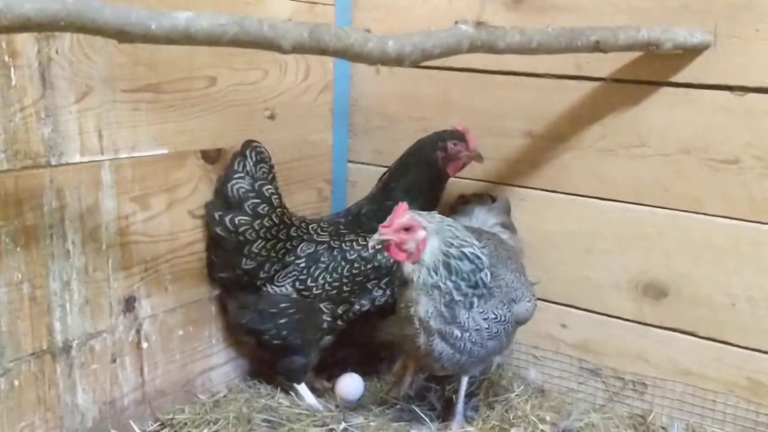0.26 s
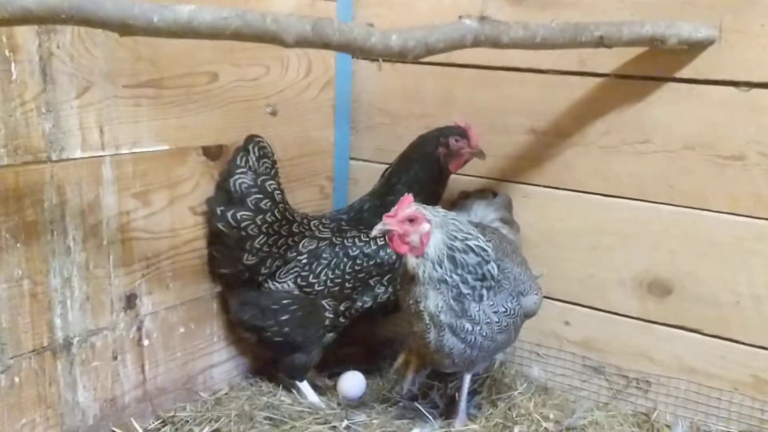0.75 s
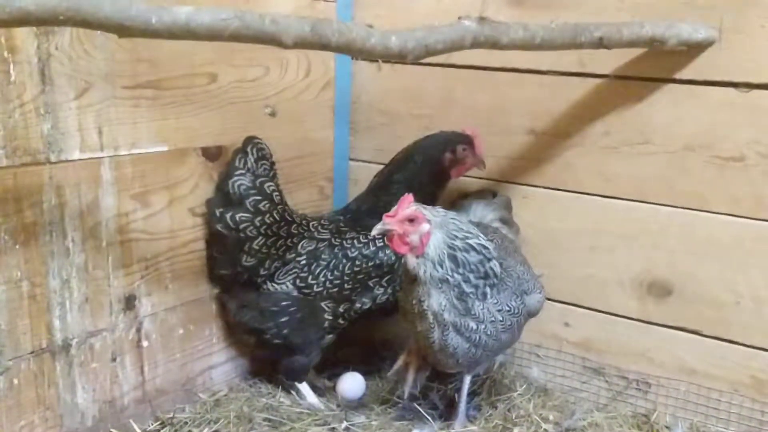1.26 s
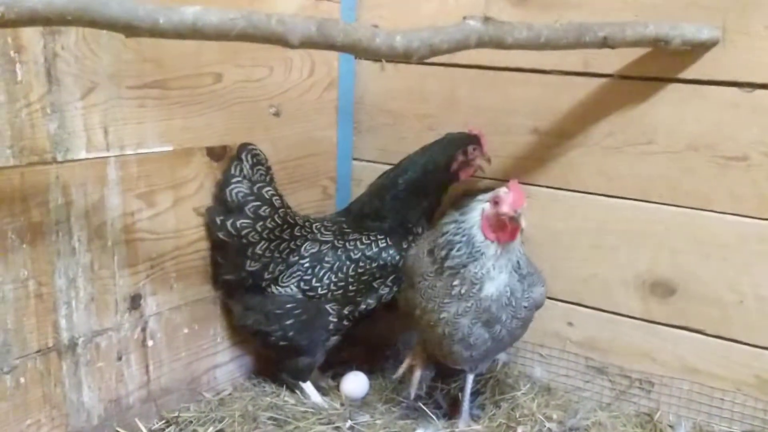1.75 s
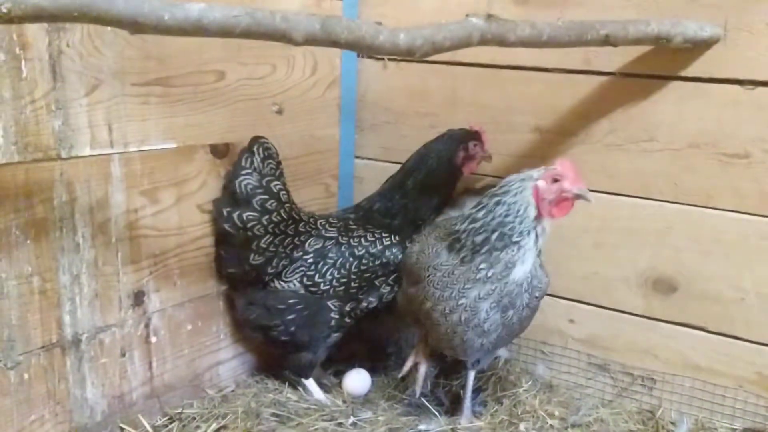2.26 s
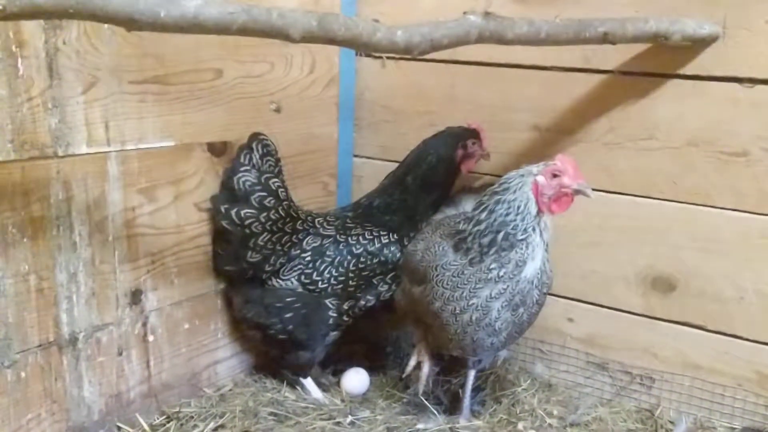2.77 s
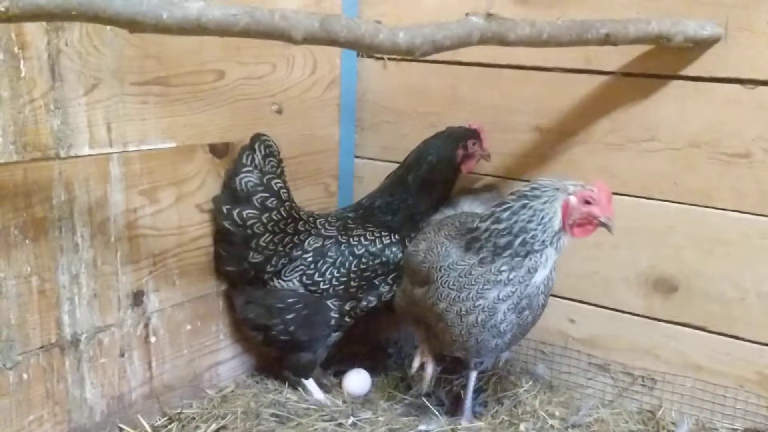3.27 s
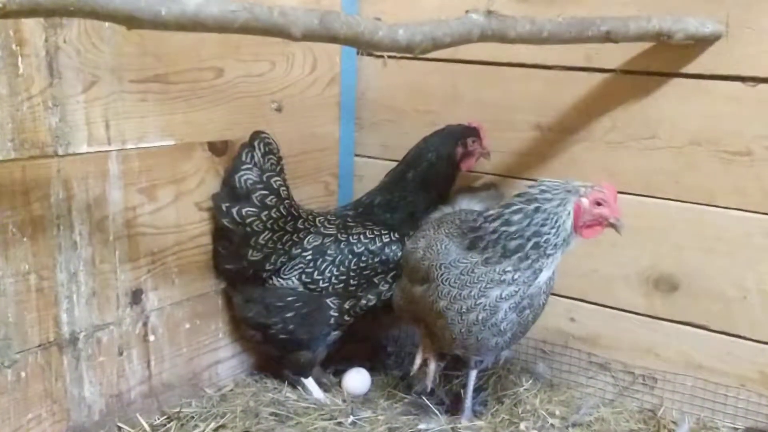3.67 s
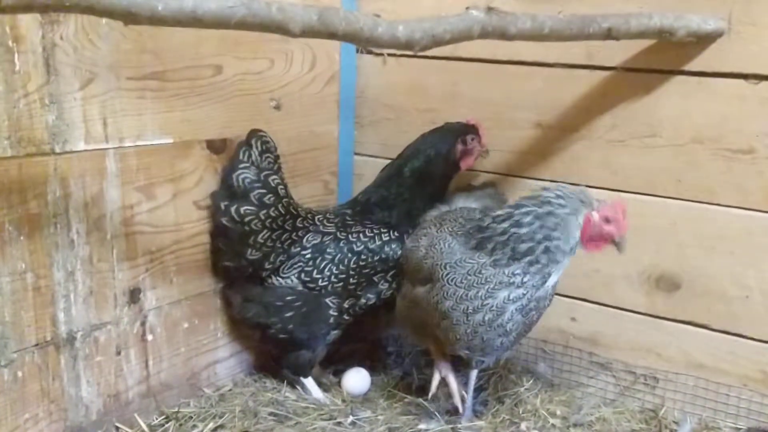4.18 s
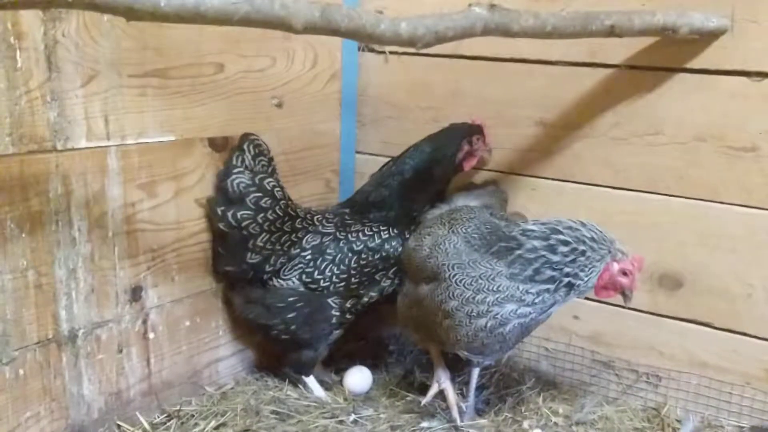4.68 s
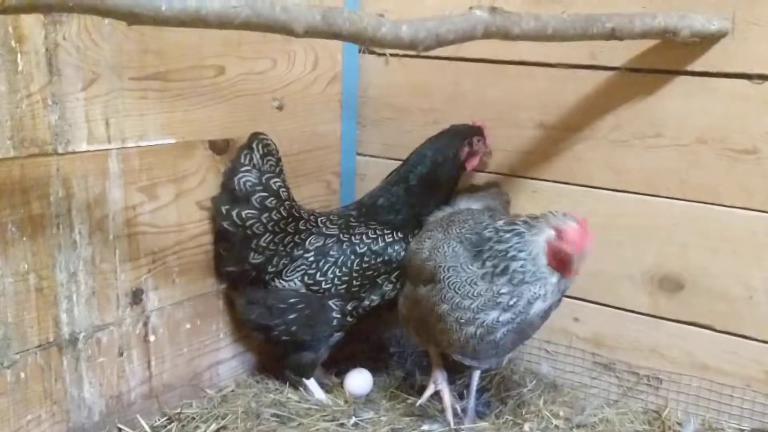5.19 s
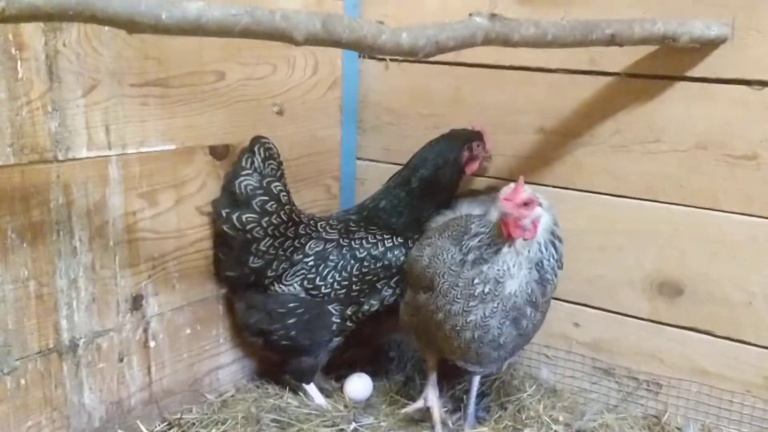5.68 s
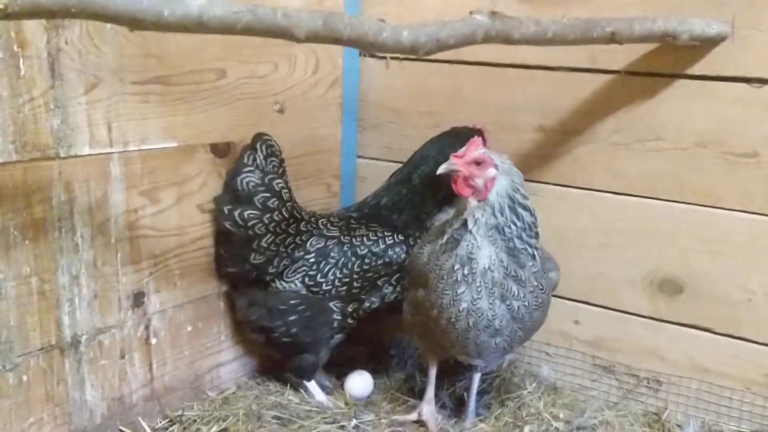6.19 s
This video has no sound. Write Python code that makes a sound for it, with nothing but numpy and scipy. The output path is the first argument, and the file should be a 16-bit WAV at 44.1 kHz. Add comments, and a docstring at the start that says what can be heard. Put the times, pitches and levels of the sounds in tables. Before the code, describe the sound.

A low rumble and soft microphone hiss run throughout, inside a wooden coop with a short echo. From about 0.3 to 1.2 seconds a hen whines softly in quavering, slightly raspy notes. Another hen, close to the phone, gives short clucks at 1.2 and 1.4 seconds, then a tiny beak snap and a loud cackle from 1.5 to 1.9 seconds. The cry holds its pitch, rises a little, then breaks hoarsely and drops. In the pause a metal tube rings very faintly around 2.5 and 3.7 seconds, and distant birds give brief, faint calls near 0.5, 2.6 and 3.7 seconds. Three more short clucks come at about 4.0, 4.2 and 4.4 seconds, with small dry beak snaps, leading into a second loud cackle from 4.5 to 4.9 seconds with the same broken ending. Only rumble and hiss remain until about 6.4 seconds.

```python
"""A hen in a wooden coop cackles twice, each long cry led by short clucks, close to a phone.
Membranes beating in her voice box make the cries; puffs of air ringing her throat make the clucks.
Another hen whines softly, far birds call, a hanging metal tube rings faintly, and the walls echo.
Under it all lie a low rumble and microphone hiss. The phone turns its gain down while the hen is loud."""
import sys
import numpy as np
from scipy import signal
from scipy.fft import rfft, irfft, next_fast_len
from scipy.io import wavfile
from scipy.ndimage import uniform_filter1d, minimum_filter1d, map_coordinates

SR = 44100
rng = np.random.default_rng(int(sys.argv[2]) if len(sys.argv) > 2 else 0)


def dump(signal):
    """Clip the signal to [-1, 1] and save it as 16-bit WAV at the path in sys.argv[1]."""
    limited = np.clip(np.atleast_2d(signal).T, -1, 1)
    pcm = np.round(limited * 32767).astype(np.int16)
    wavfile.write(sys.argv[1], SR, pcm)


N = 284004

# Tone colour of the rumble and hiss: (frequency [Hz], relative level [dB])
BACKGROUND_COLOUR = [(12, -50), (20, -20.5), (41, -8.5), (64, 4.5), (106, -9.5), (186, -16.5), (353, -20.5),
                     (453, -22), (708, -23.5), (884, -24), (1930, -30), (2100, -29), (15600, -43)]
# How the rumble rises and falls: (time [s], level [dB])
RUMBLE_LEVELS = [(0, -59), (.15, -66.5), (1.101, -67), (2.3, -62), (3.7, -69), (5.202, -63), (5.85, -66.5),
                 (6.1, -62.5), (6.44, -68)]
# How long the coop echoes: (frequency [Hz], time to fade by 60 dB [s])
ECHO_TIMES = [(200, 0.73), (900, 0.33), (2500, 0.28), (6000, 0.26), (10000, 0.022)]
# How strongly the walls echo: (frequency [Hz], level [dB])
ECHO_LEVELS = [(200, -19), (520, -13.5), (780, 0.5), (1100, -11), (1800, -8), (2300, 2.5), (2850, -10.5),
               (3400, -5), (4000, -18), (4600, -7), (5000, -18.5), (5400, -12.5), (10000, 0)]
# The tube's ringing tones: (frequency [Hz], relative level [dB], time to fade by 60 dB [s])
TUBE_TONES = [(1118, 0, 1.1), (3188, 3, .22), (4750, -6, .2), (5517, -2, .2)]
# Touches on the tube: (time [s], level [dB], treble boost [dB per two octaves])
TUBE_TAPS = [(2.452, -70.5, -3.5), (2.569, -79, -1.5), (3.663, -79, 7), (3.7, -72.5, 8.5), (3.736, -81, 5)]
# Far bird calls: (time [s], length [s], first pitch [Hz], last pitch [Hz], level [dB],
# then the relative levels of harmonics 1 to 5 [dB]). A harmonic is a whole multiple of the pitch.
FAR_CALLS = [(.51, 0.038, 862, 856, -56, -51, -4, -34, -26, -20),
             (2.625, 0.062, 927, 868, -61, -2, -17, -29.5, -25, -26),
             (2.65, 0.071, 879, 852, -58.5, -5, -1, -26, -25, -26),
             (3.657, 0.022, 1253, 1200, -53, -4.5, -13.5, -10, -30, -27)]
# The other hen, one list per note: (time [s], pitch [Hz], level [dB])
WHINE_NOTES = [
    [(0.25, 523, -70), (0.26, 496, -62), (0.296, 483, -57.5), (0.305, 517, -66)],
    [(.29, 590, -66), (.335, 791, -64.5), (.377, 726.6, -63), (.5, 790, -66), (.6, 732, -72),
     (.694, 787, -57.5), (.74, 803, -70), (.802, 693, -56), (.83, 686, -73), (.85, 677, -82)],
    [(.875, 824, -73), (.911, 694, -59), (.965, 801, -60.5), (1.013, 724.6, -64), (1.09, 749, -56),
     (1.12, 705, -72), (1.165, 722, -53)],
]
# Beak snaps: (time [s], level before filtering [dB], treble cutoff [Hz])
BEAK_SNAPS = [(1.524, -31, 7030), (4.4435, -29, 15000), (4.505, -32.5, 8040)]
# Where the throat rings: (frequency [Hz], width [Hz], level [dB])
THROAT_RESONANCES = [(231, 360, -14.5), (882, 150, 0), (1078, 79.3, 8), (1890, 220, -9.5),
                     (2470, 250, -17.5)]
# Where the beak rings, applied twice: (frequency [Hz], width [Hz], level [dB])
BEAK_RESONANCES = [(3427, 590, 4), (4710, 430, 1.5), (5250, 260, 5.5), (6925, 1000, -1), (8800, 1300, -2.5)]
# Short clucks: (time [s], length [s], first puff rate [Hz], top puff rate [Hz], throat drive [dB],
# throat swell [dB], beak drive [dB], peak of the hiss [share of the length])
SHORT_CLUCKS = [(1.167, 0.04, 189.5, 252.8, -11, 7.2, -29.5, 0.47),
                (1.397, .018, 188.8, 234.2, -18.5, 4.5, -37.5, 0.578),
                (1.412, .052, 277.7, 392.3, -1.5, 4.7, -17.5, 0.78),
                (3.961, 0.034, 199.4, 249.6, -7.5, 11, -29, 0.69),
                (4.189, 0.049, 218.8, 341.3, -0.5, 13.7, -24.5, .8),
                (4.416, .034, 226.6, 253, -2.5, 17, -25.5, 1)]
# Tone colour of the breath in a cry: (frequency [Hz], relative level [dB])
BREATH_COLOUR = [(300, -34), (850, -8), (1300, -20), (1800, -36), (2300, -14), (2850, -44), (3400, -5),
                 (4400, -7), (4900, -16), (5400, -4), (6500, -6), (9400, -15), (11000, -40), (15000, -46)]
# The voice, one list per cry: (time [s], pitch [Hz], hoarseness [0 clear to 1 broken])
CRY_VOICE = [
    [(1.525, 498, .6), (1.547, 517, .3), (1.571, 524, .2), (1.621, 512, .25), (1.655, 528, .45),
     (1.74, 529, .4), (1.765, 535, .15), (1.818, 535, .12), (1.872, 556, .12), (1.886, 571, .55),
     (1.9, 512, .9), (1.917, 442, .9), (1.94, 400, .95)],
    [(4.506, 505, .6), (4.532, 521, .2), (4.62, 521, .24), (4.72, 529, .2), (4.735, 526, .2),
     (4.79, 540, .3), (4.828, 549, .5), (4.844, 579, .75), (4.858, 528, .9), (4.875, 480, .9),
     (4.89, 428, .9), (4.91, 400, .95)],
]
# How the level of each cry rises and dips and its tone colour shifts: (time [s], level of the strong second #
# harmonic [dB], base level of the rest [dB], beak opening [below 0 narrow, above 0 wide])
CRY_LEVELS = [
    [(1.525, -17.5, -32, -0.78), (1.538, -12, -31, -0.77), (1.557, -21.5, -37, -1.66),
     (1.585, -20, -37.5, -1.73), (1.635, -28, -40, -.2), (1.662, -13.5, -37.5, -0.84),
     (1.722, -22.5, -36.5, 0.3), (1.762, -15, -35, 0.0072), (1.81, -17, -38.5, 0.15),
     (1.867, -19, -37, 0.75), (1.89, -18.5, -39, 1.02), (1.915, -25.5, -44, 0.13), (1.94, -38.5, -58, 1.3)],
    [(4.506, -13.5, -28, -0.33), (4.516, -12.5, -39, -1.1), (4.535, -17.5, -35.5, -1.1),
     (4.592, -14.5, -36.5, -0.21), (4.66, -22.5, -37.5, .05), (4.717, -14, -37, -0.1),
     (4.74, -21, -37, 0.3), (4.78, -15.5, -37.5, 0.05), (4.825, -18, -38, 1.33), (4.86, -25, -41.5, 0.55),
     (4.88, -24, -47.5, .6), (4.91, -47, -52.5, 0.68)],
]
# Harmonics that follow the beak opening: (multiple of the pitch, relative level at opening 0 [dB],
# change at opening -1 [dB], change at opening +1 [dB])
BEAK_HARMONICS = [(1, -2.5, 2.5, 10.5), (3, 6, -8, -3), (4, -10, 1, 13), (5, -3, -9.5, -9.5),
                  (6, -7, 12, -0.5), (7, -11, 8, 4), (8, -10, -11, 12.5), (9, -10.5, -0.5, -5),
                  (10, -0.5, 1, -5.5), (11, -6, 1.5, -2.5), (12, -3, -0.5, -5.5)]
# High harmonics that ignore the beak opening: (multiple of the pitch, relative level [dB])
HIGH_HARMONICS = [(13, -14.5), (14, -17.5), (15, -13), (16, -16), (17, -13.5), (18, -22), (19, -31.5),
                  (20, -40), (21, -50), (22, -45), (24, -37.5), (26, -40)]


def amp(db):
    """Turn decibels into a factor to multiply by."""
    return 10 ** (np.asarray(db) / 20)


def unit(x):
    """Scale x to an average power of 1."""
    return x / np.sqrt(np.mean(x ** 2) + 1e-20)


def along(points, hz):
    """Read between (frequency, value) points, with octaves evenly spaced."""
    f, v = np.transpose(points)
    return np.interp(np.log(hz + 1), np.log(f + 1), v)


def played(rows, fade_s):
    """Turn timed rows into a first sample, a fade in and out, and one curve per column."""
    times, *columns = np.transpose(rows)
    t = np.arange(times[0], times[-1], 1 / SR)
    fades = np.clip(np.minimum(t - times[0], times[-1] - t) / fade_s, 0, 1)
    return round(times[0] * SR), fades, [np.interp(t, times, c) for c in columns]


def add(out, start, x):
    """Mix x into out, beginning at sample start."""
    out[start:start + len(x)] += x[:len(out) - start]


def wobble(size, rate, channels=1):
    """Smooth curves through rate random points a second."""
    points = rng.standard_normal((channels, int(size * rate / SR) + 4))
    return np.array([map_coordinates(p, [np.arange(size) * rate / SR]) for p in points])


def filtered(x, response):
    """Scale each frequency of x by response(frequency), leaving room for a short tail."""
    size = next_fast_len(len(x) + SR // 4)
    return irfft(rfft(x, size) * response(np.fft.rfftfreq(size, 1 / SR)), size)[:len(x) + SR // 20]


def resonances(rows):
    """The response of a hollow space that rings at a few frequencies."""
    return lambda f: sum((-1) ** k * amp(db) * 1j * f * width / (hz * hz - f * f + 1j * f * width)
                         for k, (hz, width, db) in enumerate(rows))


def noise(size, colour):
    """Noise with the given tone colour and an average power of 1."""
    return unit(filtered(rng.standard_normal(size), lambda hz: amp(along(colour, hz)))[:size])


def rumble_and_hiss():
    """A far rumble swells unevenly under smooth microphone hiss."""
    times, db = np.transpose(RUMBLE_LEVELS)
    bass = [p for p in BACKGROUND_COLOUR if 30 < p[0] < 130]
    rumble = noise(N, [(10, -65.5), (25, -22)] + bass + [(170, -43.5), (300, -87)])
    hiss = noise(N, [(60, -65.5)] + [p for p in BACKGROUND_COLOUR if p[0] > 100])
    swells = amp(2.2 * wobble(N, 5.2)[0])
    return amp(np.interp(np.arange(N) / SR, times, db)) * swells * rumble + amp(-69) * hiss


def fading_cluck():
    """The walls still ring from a cluck just before the start."""
    t = np.arange(N) / SR
    ring = unit(filtered(rng.standard_normal(N), resonances(THROAT_RESONANCES))[:N])
    return amp(-63 - 60 * t / .5) * ring


def coop_echo(x):
    """Plank walls echo the sound in short, overlapping, diffuse tails."""
    out, step = np.zeros(N), SR // 6
    for start in range(0, N - 2 * step, step):
        # each echo is fresh noise in which every frequency fades at its own speed
        hz, t, bands = signal.stft(rng.standard_normal(SR // 2), SR, nperseg=256)
        tail = signal.istft(bands * amp(-60 * t / along(ECHO_TIMES, hz)[:, None]), SR, nperseg=256)[1]
        piece = x[start:start + 2 * step] * np.hanning(2 * step)
        add(out, start + 300, signal.fftconvolve(piece, tail / np.linalg.norm(tail)))
    return filtered(out, lambda hz: amp(along(ECHO_LEVELS, hz)))[:N]


def metal_tube():
    """Soft touches set the metal ringing, some dull, some bright."""
    out, t = np.zeros(N), np.arange(SR // 2) / SR
    onset = 1 - np.exp(-t / .0044)
    for time, tap_db, treble_db in TUBE_TAPS:
        for hz, tone_db, ring_s in TUBE_TONES:
            strength_db = tap_db + tone_db + treble_db * np.log2(hz / TUBE_TONES[0][0]) / 2
            level_db = strength_db + 3.7 * wobble(len(t), 25)[0] - 60 * t / ring_s
            add(out, round(time * SR), amp(level_db) * np.sin(2 * np.pi * hz * t) * onset)
    return out


def far_birds():
    """Far birds call in short falling notes with a few harmonics."""
    out = np.zeros(N)
    for time, length, first_hz, last_hz, db, *harmonics_db in FAR_CALLS:
        progress = np.arange(0, 1, 1 / (length * SR))
        phase = 2 * np.pi * np.cumsum(first_hz + (last_hz - first_hz) * progress) / SR
        note = sum(amp(level) * np.sin(k * phase) for k, level in enumerate(harmonics_db, 1))
        add(out, round(time * SR), amp(db) * np.sin(np.pi * progress) ** .58 * note)
    return out


def whining_hen(octave_db=-17.5):
    """Another hen holds soft, quavering, slightly raspy notes."""
    out = np.zeros(N)
    for rows in WHINE_NOTES:
        start, fades, (hz, db) = played(rows, fade_s=.006)
        quaver, throb = wobble(len(hz), 31.14, channels=2)
        rasp = wobble(len(hz), 151.2)[0]
        phase = 2 * np.pi * np.cumsum(hz * (1 + .03 * quaver + .03 * rasp)) / SR
        note = np.sin(phase) + amp(octave_db) * np.sin(2 * phase)
        add(out, start, fades * np.sqrt(2) * amp(db + 3.4 * throb) * note)
    return out


def beak_snaps():
    """The beak snaps with a dry crack of about a millisecond."""
    out, t = np.zeros(N), np.arange(200) / SR
    for time, db, cutoff_hz in BEAK_SNAPS:
        crack = amp(db - 60 * t / .0015) * rng.standard_normal(len(t))
        add(out, round(time * SR), filtered(crack, lambda f: 1j * f / 3000 / (1 + 1j * f / cutoff_hz) ** 5))
    return out


def clucks():
    """Soft puffs of air ring the throat; each carries a short hiss through the beak."""
    onset_s, onset_db, ebb_db = .011, 19, 3
    hiss_onset_db, hiss_rise_db, hiss_fall_db = 23, 21.5, 15
    glide_end, throat_peak = .66, .7  # shares of the length
    throat, beak = resonances(THROAT_RESONANCES), resonances(BEAK_RESONANCES)
    soft = lambda f: 1 / (1 + 1j * f / 1800) ** 3  # a rounded puff has little treble
    out = np.zeros(N)
    for time, length, first_hz, top_hz, throat_db, swell_db, beak_db, hiss_peak in SHORT_CLUCKS:
        start, progress = round(time * SR), np.arange(0, 1, 1 / (length * SR))
        hz = first_hz + (top_hz - first_hz) * np.minimum(progress / glide_end, 1)
        # throat and beak both start quickly, swell to a peak and ebb
        onset_left = np.maximum(1 - progress * length / onset_s, 0)
        throat_arch = np.interp(progress, [0, throat_peak, 1], [-swell_db, 0, -ebb_db])
        beak_arch = np.interp(progress, [0, min(hiss_peak, .95), 1], [-hiss_rise_db, 0, -hiss_fall_db])
        throat_gain = amp(throat_db - onset_db * onset_left + throat_arch)
        beak_gain = amp(beak_db - hiss_onset_db * onset_left + beak_arch)
        cycles = np.cumsum(hz * (1 + .03 * wobble(len(hz), 220)[0])) / SR
        puffs = np.diff(np.floor(cycles), prepend=-1) * np.sqrt(SR / hz)  # one per cycle
        puffs *= amp(1.5 * wobble(len(hz), 250)[0])
        hiss = 1.1 * rng.standard_normal(len(hz)) * np.exp(-(cycles % 1) / .34)
        add(out, start, filtered(throat_gain * puffs, lambda f: soft(f) * throat(f)))
        add(out, start, filtered(beak_gain * (.28 * puffs + hiss), lambda f: beak(f) ** 2))
    return out


def cackles():
    """Membranes beat at the pitch; hoarseness shakes the beat and lets air leak past once a cycle."""
    out = np.zeros(N)
    beak_multiples, half_open_db, narrow_db, wide_db = np.transpose(BEAK_HARMONICS)[..., None]
    high_multiples, high_db = np.transpose(HIGH_HARMONICS)[..., None]
    multiples = np.round(np.vstack([[2], beak_multiples, high_multiples]))
    for voice, levels in zip(CRY_VOICE, CRY_LEVELS):
        start, fades, controls = played(levels, fade_s=.002)
        # loudness and tone colour shift smoothly
        second_db, rest_db, opening = uniform_filter1d(controls, size=SR // 200, axis=1)
        size = len(fades)
        t = (start + np.arange(size)) / SR
        times, hz, hoarse = np.transpose(voice)
        hz, hoarse = np.interp(t, times, hz), np.interp(t, times, hoarse)
        waver = (.002 + .012 * hoarse) * wobble(size, 45)[0]
        rasp = (.012 * hoarse + .05 * hoarse ** 3) * wobble(size, 250)[0]
        phase = 2 * np.pi * np.cumsum(hz * (1 + waver + rasp)) / SR
        beak_db = half_open_db + narrow_db * np.maximum(-opening, 0) + wide_db * np.maximum(opening, 0)
        colour_db = np.vstack([beak_db, np.tile(high_db, size)])
        shimmer_db = 2.2 * wobble(size, 30, channels=len(multiples) - 1)
        level_db = np.vstack([second_db, rest_db + colour_db + shimmer_db])
        # each harmonic flutters quickly, the high ones most
        depth = 1.8 * hoarse * np.clip((multiples - 4) / 4, .8 * hoarse ** 2, 1)
        flutter = 1 + depth * wobble(size, 140, channels=len(multiples))
        waves = np.sqrt(2) * np.sin(multiples * phase - .4 * multiples ** 2)
        tone = np.sum(amp(level_db) * flutter * waves, axis=0)
        air = noise(size, BREATH_COLOUR) * (1 + .8 * np.cos(phase)) * hoarse ** 1.3 * amp(rest_db + 7)
        breath_left = np.clip((t[-1] - t) / .008, 0, 1)
        add(out, start, fades * breath_left * (tone + air))
    return out


def scene():
    """Mix the hen, the faint sounds around her, their echo and the background into one channel."""
    hen = cackles() + clucks() + beak_snaps()
    faint = whining_hen() + far_birds() + metal_tube()
    direct = hen + faint
    return (direct + coop_echo(direct) + fading_cluck() + rumble_and_hiss())[None]


def record(dry):
    """The phone eases its gain down during loud sound and cuts off the highest treble."""
    averaging_s, threshold_db, max_cut_db, top_hz = .03, -30, 9, 15740
    memory = np.exp(-1 / (averaging_s * SR))
    loud_db = 10 * np.log10(signal.lfilter([1 - memory], [1, -memory], dry[0] ** 2) + 1e-12)
    gain_db = -max_cut_db / (1 + np.exp(-(loud_db - threshold_db) / 2.5))
    gain_db = minimum_filter1d(gain_db, SR // 40)  # looks a little ahead
    gain_db = uniform_filter1d(gain_db, SR // 50)
    return filtered(dry[0] * amp(gain_db), lambda hz: hz < top_hz)[None, :N]


dry = scene()
out = record(dry)
dump(out)
```